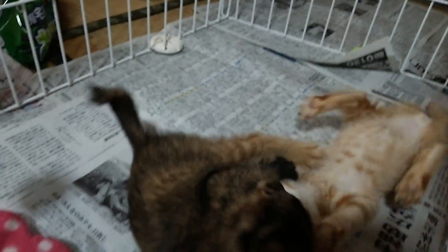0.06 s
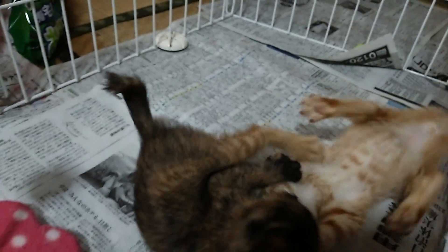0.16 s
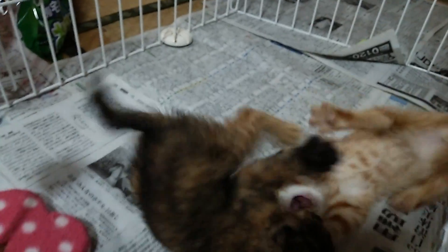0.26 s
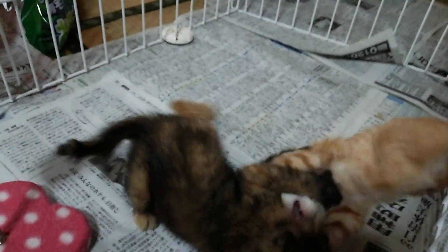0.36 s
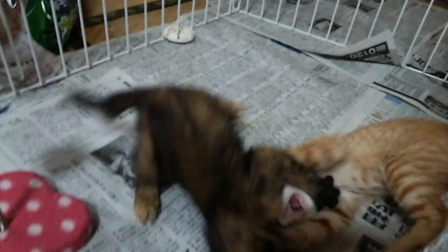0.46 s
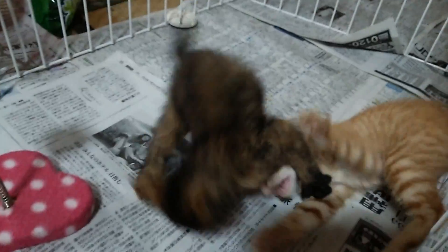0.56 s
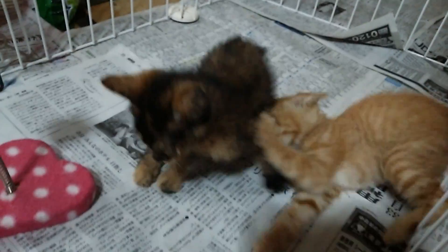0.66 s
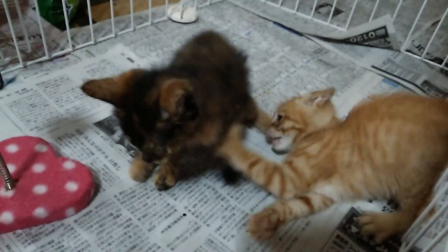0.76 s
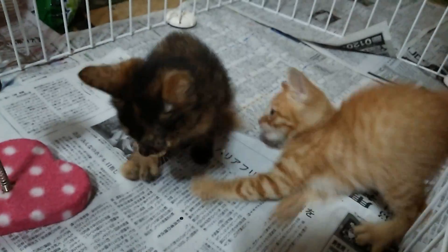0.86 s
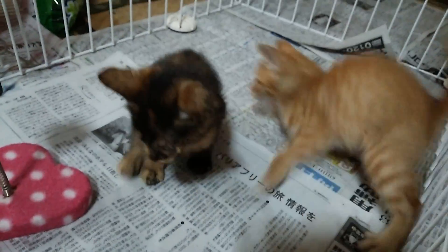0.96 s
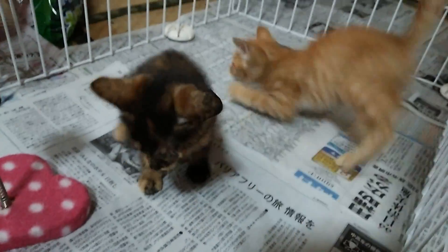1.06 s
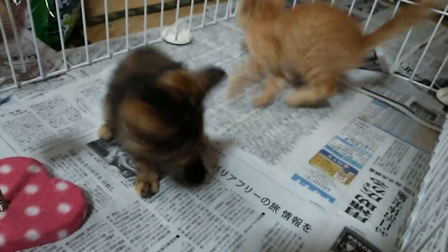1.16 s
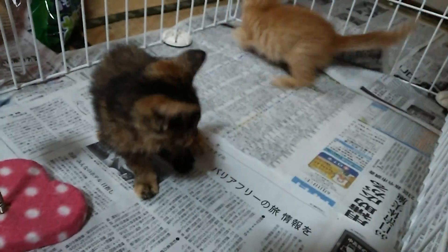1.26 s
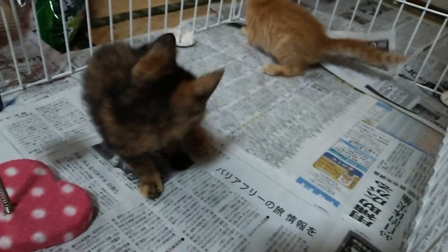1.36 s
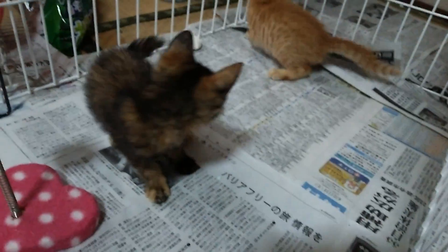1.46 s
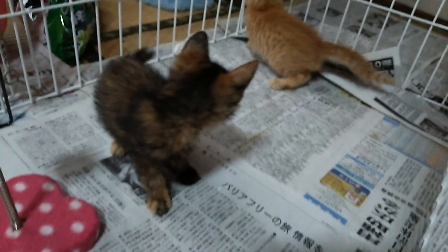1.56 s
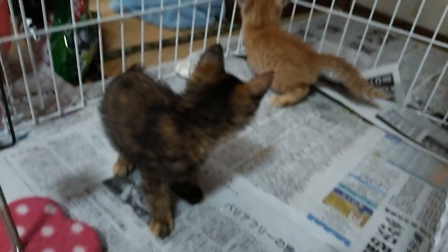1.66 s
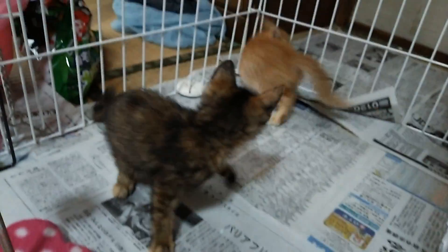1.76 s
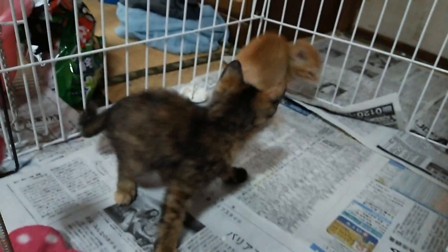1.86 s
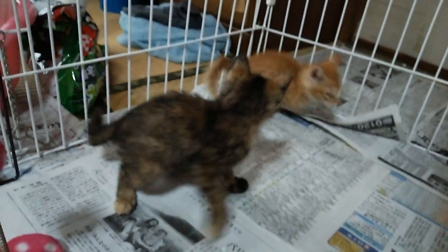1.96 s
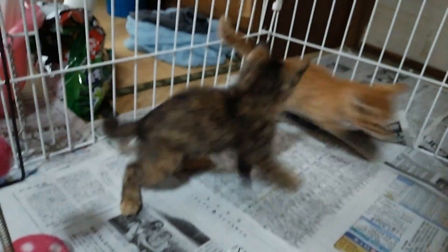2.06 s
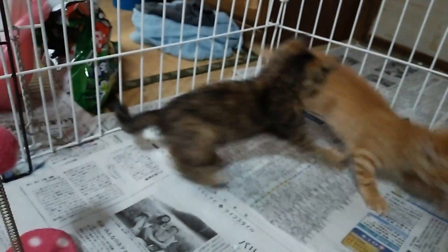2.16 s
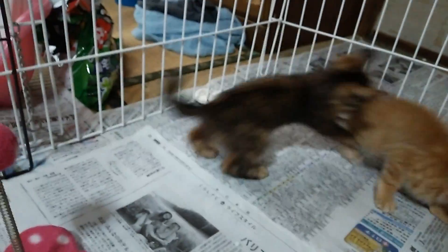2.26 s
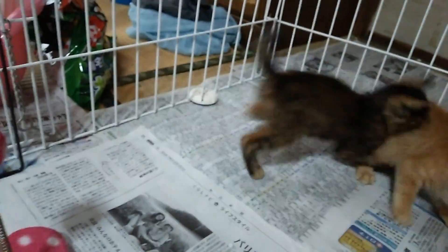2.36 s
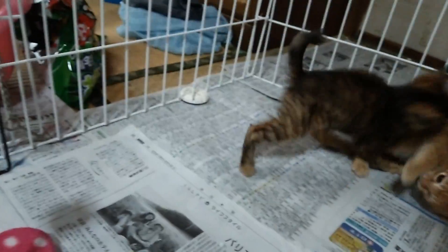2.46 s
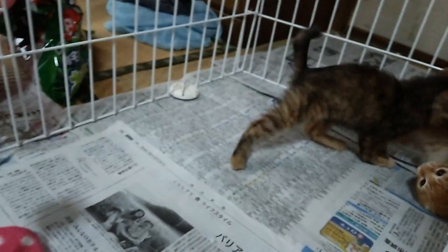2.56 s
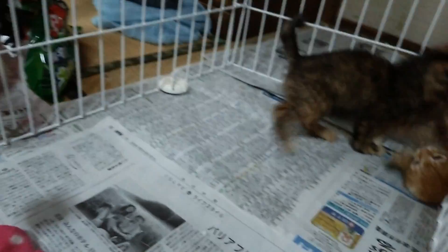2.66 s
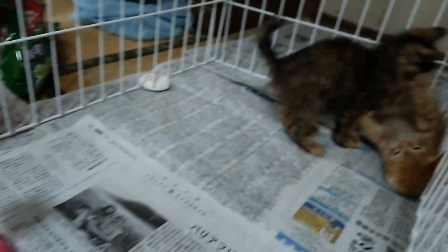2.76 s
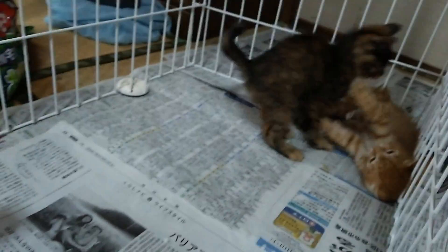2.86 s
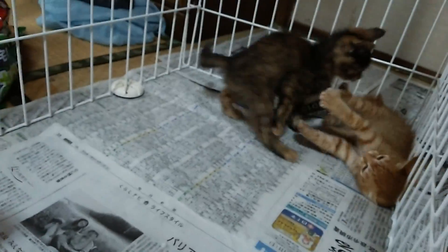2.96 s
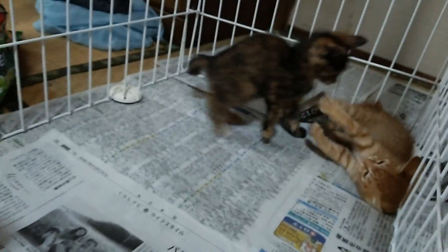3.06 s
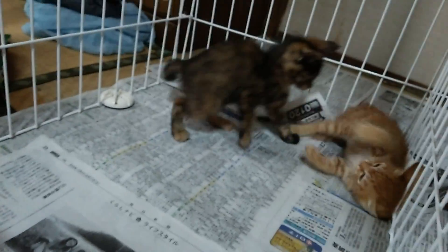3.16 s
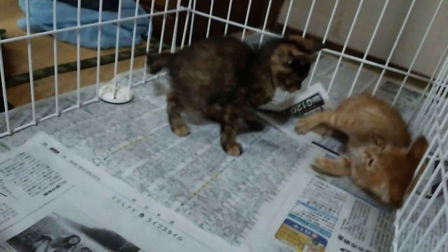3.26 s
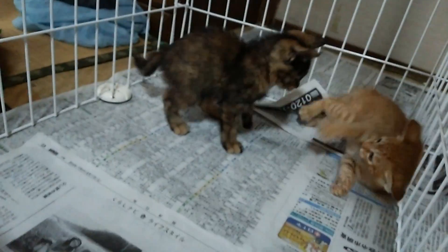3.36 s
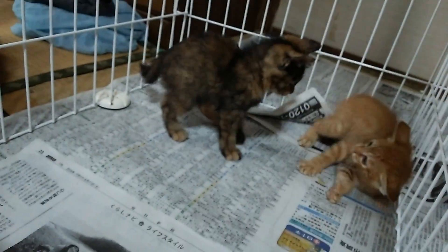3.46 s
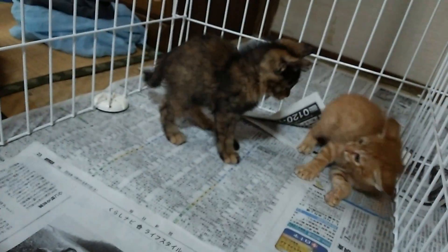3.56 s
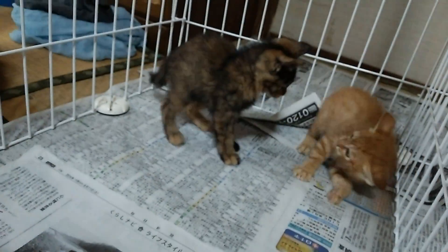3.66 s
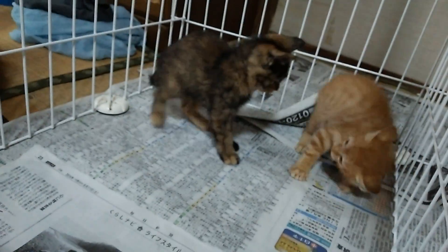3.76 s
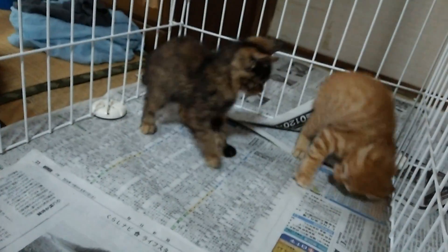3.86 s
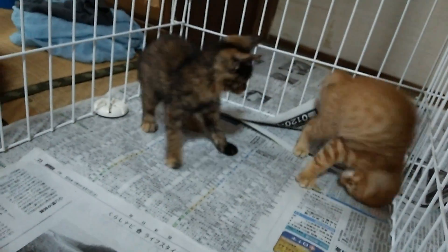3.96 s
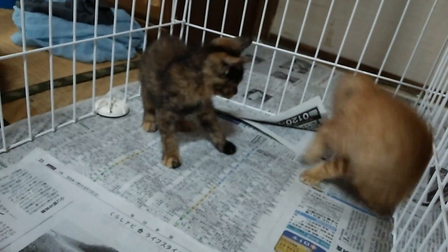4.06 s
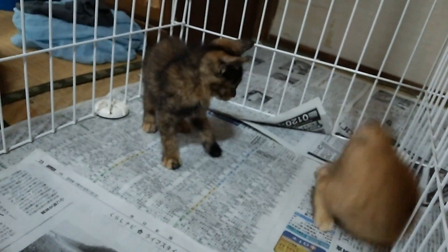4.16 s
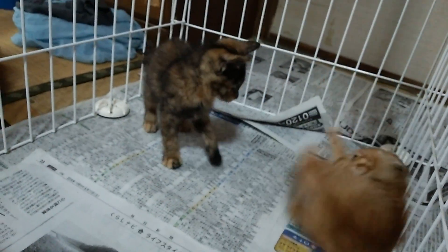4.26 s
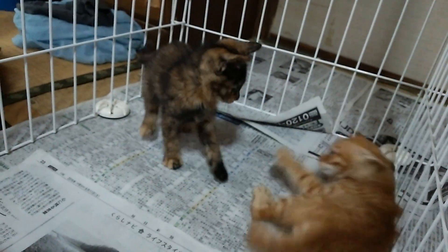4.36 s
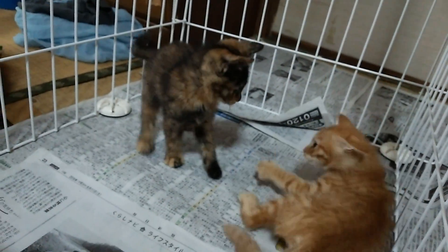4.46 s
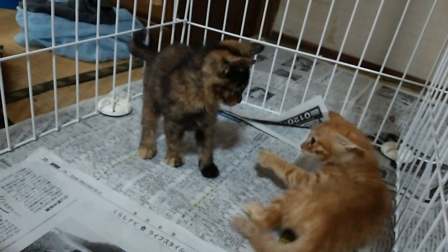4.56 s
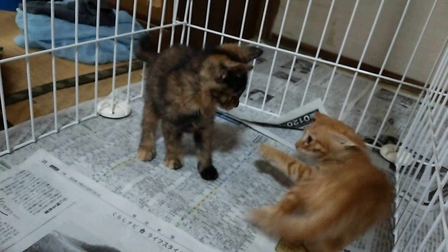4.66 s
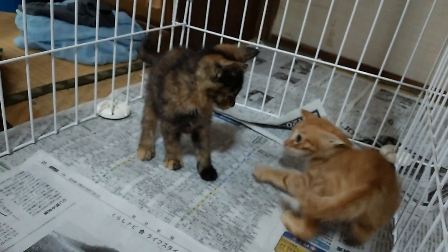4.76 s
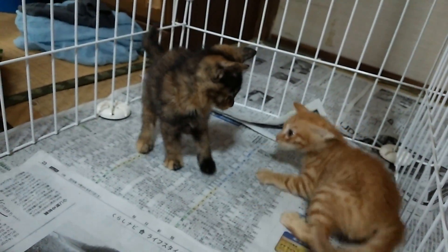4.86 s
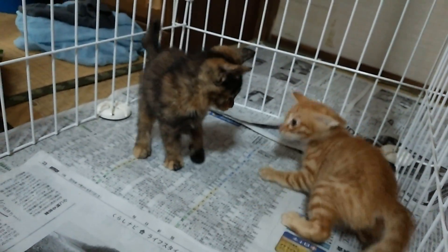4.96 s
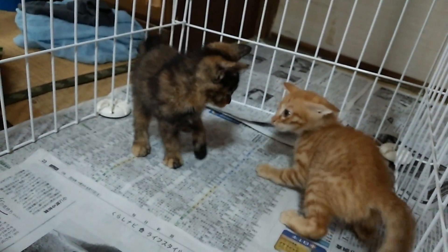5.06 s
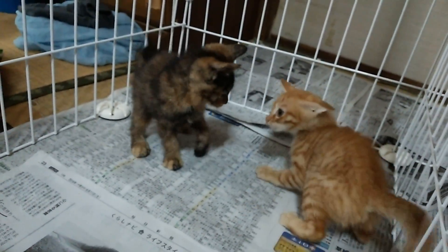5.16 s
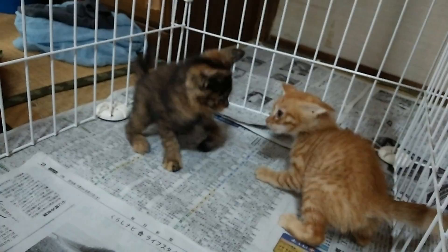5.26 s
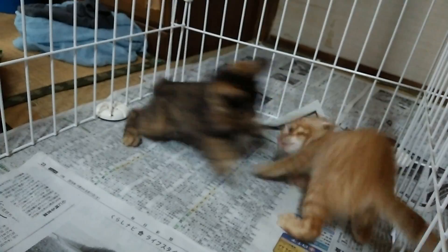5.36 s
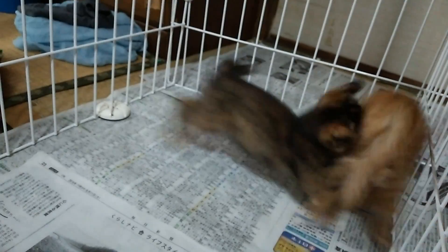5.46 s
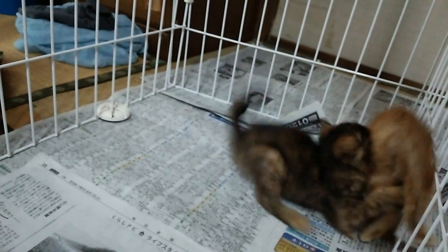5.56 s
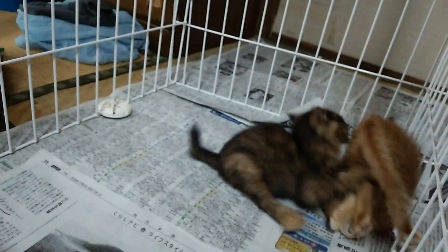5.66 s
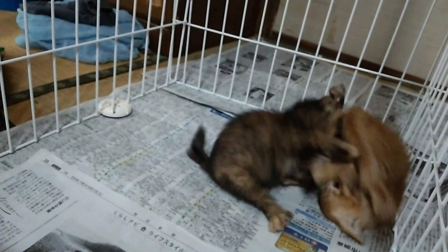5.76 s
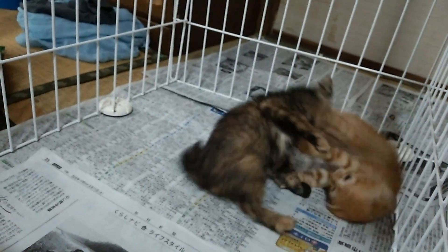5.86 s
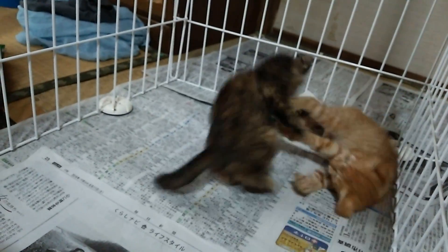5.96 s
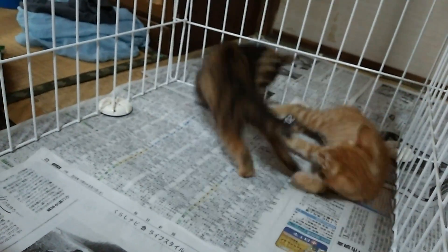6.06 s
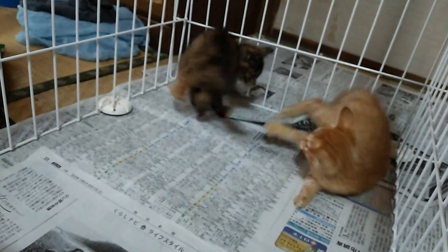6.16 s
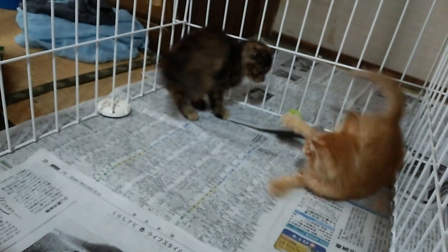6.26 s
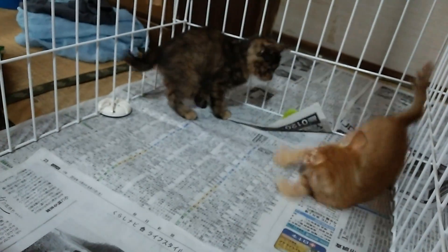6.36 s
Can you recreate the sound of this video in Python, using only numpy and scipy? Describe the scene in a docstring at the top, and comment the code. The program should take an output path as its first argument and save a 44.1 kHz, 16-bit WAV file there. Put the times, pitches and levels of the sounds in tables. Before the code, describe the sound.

Newspaper crinkles close to the microphone as two kittens wrestle on it indoors. Quick clusters of sharp paper cracks and rustles come with dull bumps on the floorboards and a few faint claw scrapes. Lighter, more separate crackles follow, then a short lull and a final pounce of crunching and thuds. The small room hums faintly underneath, along with a soft rumble from the hand holding the microphone.

```python
"""Two kittens wrestle on newspaper spread over the wooden floor of a wire pen, in a small quiet room.
Paws and claws snap the paper's creases, each a short crunch of tiny cracks. Bodies drag the paper and
thud on the boards, fur and claws scrape, and the room hums faintly. A hand-held camera listens with a
widened stereo pair: left and right swing opposite ways in the bass, and its treble peaks near 6 kHz."""
import sys
import numpy as np
from scipy import signal
from scipy.fft import rfft, irfft, next_fast_len
from scipy.io import wavfile
from scipy.ndimage import uniform_filter1d, map_coordinates

SR = 44100
rng = np.random.default_rng(int(sys.argv[2]) if len(sys.argv) > 2 else 0)


def output_pcm(signal):
    """Save a mono or channel-first signal as 16-bit PCM at the path in sys.argv[1].

    Samples are clipped to [-1, 1] before scaling.
    """
    pcm = np.clip(np.atleast_2d(signal).T, -1, 1) * 32767
    wavfile.write(sys.argv[1], SR, np.round(pcm).astype(np.int16))


N = 282240


def amp(db):
    """Turn decibels into a gain."""
    return 10 ** (np.asarray(db) / 20)


def unit(x):
    """Scale a sound to an average strength (rms) of 1."""
    return x / np.sqrt(np.mean(x ** 2) + 1e-20)


def along(points, hz):
    """Read a (pitch, value) table between its rows, on a scale of octaves."""
    pitches, values = np.transpose(points)
    return np.interp(np.log(hz + 1), np.log(pitches + 1), values)


def curves(rows):
    """Turn each column after the time into one value per sample."""
    times, *columns = np.transpose(rows)
    return [np.interp(np.arange(N) / SR, times, column) for column in columns]


def wobble(rate):
    """A smooth curve through `rate` random points a second."""
    return map_coordinates(rng.standard_normal(int(N * rate / SR) + 4), [np.arange(N) * rate / SR])


def noise(n=N):
    """Two separate white noises."""
    return rng.standard_normal((2, n))


def filtered(x, response):
    """Give each pitch in x the gain response(hz)."""
    n = x.shape[-1]
    size = next_fast_len(n + 4096)
    return irfft(rfft(x, size) * response(np.fft.rfftfreq(size, 1 / SR)), size)[..., :n]


def coloured(x, tone):
    """Shape x with a (pitch, level) table, at strength 1."""
    return unit(filtered(x, lambda hz: amp(along(tone, hz))))


def band(centre_hz, octaves):
    """A bell-shaped filter that lets a little of every other pitch through."""
    return lambda hz: np.exp(-(np.log2((hz + 1) / centre_hz) / octaves) ** 2 / 4) + amp(-23)


def crackle(n, spiky_db, size):
    """Two noises chopped into the same tiny cracks of uneven strength, `size` samples each."""
    strength = amp(spiky_db * rng.standard_normal(n // size + 1))
    return unit(np.repeat(strength, size)[:n] * noise(n))


def patchy(x, depth_db):
    """Random loud and soft patches in time and pitch: every fold of the sheet rings differently."""
    spectrum = signal.stft(x, nperseg=256)[2]
    patches = uniform_filter1d(rng.standard_normal(spectrum.shape[1:]), size=5, axis=0)
    patches = unit(uniform_filter1d(patches, size=8, axis=1))
    return unit(signal.istft(spectrum * amp(depth_db * patches), nperseg=256)[1][:, :N])


# how alike the two microphones sound: (pitch [Hz], likeness [0 to 1])
LIKENESS = [(60, .985), (250, .93), (700, .92), (1050, .8), (1400, .62), (2500, .5), (12000, .5)]
def widen(pair, lead_s=0):
    """The right side mixes its own sound with the left one, flipped over and lead_s early."""
    shared = filtered(pair[0], lambda hz: -along(LIKENESS, hz) * np.exp(2j * np.pi * hz * lead_s))
    own = filtered(pair[1], lambda hz: np.sqrt(1 - along(LIKENESS, hz) ** 2))
    return np.array([pair[0], shared + own])


# loudness of the low sounds: (time [s], rumble [dB], murmur [dB])
LOW_LEVELS = [(0, -55, -56), (.15, -67, -55.5), (.35, -60, -63), (.5, -48, -58.5), (.7, -61, -55),
              (1.0, -53, -59.5), (1.4, -63, -59), (1.6, -57.5, -62), (2.0, -58.5, -64), (2.5, -52, -57),
              (2.9, -56, -62.5), (3.5, -55.5, -57.5), (4.1, -56, -64), (4.33, -53, -58), (4.5, -60, -58.5),
              (4.8, -65, -69.5), (5.0, -59, -58.5), (5.2, -71.5, -73.5), (5.45, -57, -66.5),
              (5.75, -59, -56), (6.0, -48, -61), (6.4, -66, -59.5)]
# tone of the hand's rumble, the room's murmur and the microphone's hiss: (pitch [Hz], level [dB])
RUMBLE_TONE = [(25, -37.5), (36, -13), (47, -2), (60, -14.5), (80, -12.5), (130, -18.5), (200, -53.5)]
MURMUR_TONE = [(60, -34.5), (100, 2.5), (200, 4.5), (330, -3), (600, -4.5), (1000, -16), (1600, -31),
               (3000, -55)]
HISS_TONE = [(470, -20), (800, -2), (862, 15.5), (1420, -6), (1900, -11.5), (2870, -30), (4990, -5.5),
             (8990, -19.5), (16000, -34)]
def background():
    """The hand on the camera rumbles, the room hums and murmurs, and the microphone hisses."""
    t = np.arange(N) / SR
    rumble_db, murmur_db = curves(LOW_LEVELS)
    rumble = amp(rumble_db) * coloured(noise(), RUMBLE_TONE)
    hum_db = np.minimum(murmur_db - 1, -61.5)
    beating = np.cos(np.pi * (t - 3.5) / .37)  # two close hums swell together every 0.37 s
    hum = amp(hum_db) * beating * np.sqrt(2) * np.sin(2 * np.pi * 151 * t + 1.3 * wobble(10))
    murmur = amp(murmur_db + 1.5 * wobble(14)) * coloured(noise(), MURMUR_TONE)
    hiss = amp(-90.5) * coloured(noise(), HISS_TONE)
    return rumble + hum * [[1], [0]] + murmur + hiss


# how long the room rings: (pitch [Hz], time to fade by 60 dB [s])
ECHO_FADE = [(200, .3), (1000, 0.16), (4000, 0.26), (10000, 0.017)]
def room_echo(x):
    """The walls throw the sound back; each pitch dies away at its own speed."""
    hz, t, spectrum = signal.stft(noise(SR // 2), SR, nperseg=256)
    fade = amp(-60 * t / along(ECHO_FADE, hz)[:, None])
    tail = signal.istft(spectrum * fade, SR, nperseg=256)[1]
    delayed = np.pad(x, ((0, 0), (200, 0)))
    return signal.fftconvolve(delayed, tail / np.linalg.norm(tail[0]), axes=1)[:, :N]


# bodies landing: (time [s], level [dB], boom pitch [Hz], knock against boom [dB], time to fade 60 dB [s])
LANDINGS = [(0.455, -31.5, 68, -27, 0.23), (0.802, -39.5, 109, -7, 0.11), (0.969, -36, 61.7, -8.5, 0.21),
            (1.057, -47, 60.4, -16, 0.45), (1.134, -41, 67.5, -14, 0.22), (1.318, -31, 80, -22, 0.12),
            (1.379, -38.5, 81.5, -5, 0.22), (1.438, -43.5, 84.5, 3.5, 0.17), (2.04, -34.5, 94, -9, 0.063),
            (2.266, -46, 187, -9, 0.071), (2.356, -34.5, 73.6, -13, 0.27), (2.39, -44.5, 125, -9, 0.29),
            (2.427, -34.5, 98, -32, 0.099), (2.471, -45.5, 90, -4, 0.15), (2.84, -44.5, 49, -30, 0.11),
            (4.25, -37, 128, -11, 0.12), (4.321, -42, 96, -18, 0.25), (4.933, -38.5, 50.7, -10, 0.17),
            (4.963, -41.5, 91, -13, 0.18), (5.548, -43.5, 67, -19, 0.24), (5.612, -44.5, 79.6, -30, 0.29),
            (5.672, -32.5, 69.4, -6.5, 0.12), (5.736, -29, 71, -9, 0.22), (5.806, -40, 87.2, -12, 0.078),
            (5.963, -41, 82.4, -14, 0.45), (6.101, -45, 150, -0.5, 0.17), (6.197, -37.5, 97, -18, 0.19),
            (6.239, -43, 80.5, -1.5, 0.23)]
# tone of the shaking floor and of the knock: (pitch [Hz], level [dB])
SHAKE_TONE = [(30, -43.5), (55, -5.5), (100, 11.5), (180, 7.5), (300, -40.5)]
KNOCK_TONE = [(150, -46.5), (280, 21.5), (600, 15.5), (1200, -36)]
def floor_thuds():
    """A soft body sets a board booming at its own pitch; a harder landing adds a short knock."""
    out, t = np.zeros((2, N + SR)), np.arange(SR // 2) / SR
    for start, db, hz, knock_db, fade_s in LANDINGS:
        shape = (1 - np.exp(-t / .003)) * amp(-60 * t / fade_s)
        overtone = .26 * np.sin(2 * np.pi * 1.3 * hz * t) * amp(-60 * t / .16)
        boom = np.sin(2 * np.pi * hz * t) + overtone
        shake = .6 * coloured(noise(len(t)), SHAKE_TONE)
        knock = amp(knock_db - 60 * t / .097) * coloured(noise(len(t)), KNOCK_TONE)
        thud = shape * (boom * [[1], [0]] + shake) + knock
        out[:, round(start * SR):][:, :len(t)] += amp(db) * thud
    return out[:, :N]


# strokes of fur and claws: (start [s], end [s], pitch [Hz], width [octaves], level [dB])
STROKES = [(0.07, 0.193, 684, 0.36, -59), (1.16, 1.313, 1750, 0.19, -60), (1.429, 1.58, 2240, 0.24, -74),
           (2.688, 2.756, 5400, 0.096, -56.5), (3.94, 4.164, 5340, 0.098, -61.5),
           (3.967, 4.1, 3150, 0.054, -73), (4.845, 4.905, 5570, 0.38, -65),
           (5.362, 5.458, 6240, 0.3, -58.5), (6.292, 6.313, 745, 0.32, -61)]
def scrapes():
    """Sliding fur and claws make grainy noise in one narrow band that swells and fades."""
    out, t = np.zeros((2, N)), np.arange(N) / SR
    for start, end, hz, octaves, db in STROKES:
        swell = np.clip(np.minimum(t - start, end - t) / .03, 0, 1)
        out += amp(db + .9 * wobble(50)) * swell * unit(filtered(noise(), band(hz, octaves)))
    return out


# loudness of the sliding paper: (time [s], level [dB], dull flap against fizz [dB])
DRAG_LEVELS = [(0, -64.5, 1), (.14, -67.5, -4), (.29, -78.5, 0), (.45, -50, -7.5), (.7, -59.5, -5),
               (.9, -56.5, -1), (1.1, -50, -1.5), (1.27, -72, 5), (1.33, -46.5, -2.5), (1.4, -48.5, -2),
               (1.57, -73, 3), (1.79, -77, -1), (1.86, -67, 0.5), (1.95, -68.5, 1), (2.07, -52.5, -2),
               (2.25, -78, -1), (2.45, -48.5, -1.5), (2.62, -65, 0.5), (2.75, -62, -7), (2.95, -79.5, -1.5),
               (3.05, -63, -2), (3.4, -65, -0.5), (3.55, -68.5, -2), (3.68, -59.5, -1), (3.85, -76.5, -5),
               (4.0, -65.5, -15), (4.3, -65, -2.5), (4.68, -67.5, -4.5), (4.72, -81.5, -3.5),
               (4.8, -88.5, -4), (4.95, -63, -2.5), (5.1, -91, -3), (5.33, -90, 2), (5.45, -57.5, -2),
               (5.78, -59, -1.5), (5.88, -63.5, -7), (6.0, -59.5, -4), (6.2, -61, 4), (6.3, -69, 3.5),
               (6.4, -55, -3)]
# tone of the paper's fizz and of a slack sheet flapping: (pitch [Hz], level [dB])
FIZZ_TONE = [(880, -41.5), (1500, -32), (1760, -19), (2490, 1), (3060, -4), (3310, 1), (3690, -4.5),
             (6000, 2.5), (8000, 1), (9370, -7), (10000, -10.5), (12000, -20.5), (14600, -63.5),
             (16000, -58.5)]
FLAP_TONE = [(250, -3), (500, -0.5), (800, 0), (1200, -1.5), (2000, -2), (3000, -5), (5000, -39.5)]
def paper_drag():
    """Dragged or settling paper fizzes with clumps of cracks; low, middle and top swell separately."""
    db, flap_db = curves(DRAG_LEVELS)
    fizz = patchy(coloured(crackle(N, spiky_db=4.2, size=24), FIZZ_TONE), depth_db=3)
    top = filtered(fizz, lambda hz: 1 / (1 + (7000 / (hz + 1)) ** 12))
    flap = patchy(coloured(crackle(N, spiky_db=1.5, size=96), FLAP_TONE), depth_db=-1.5)
    clumps = amp(2 * wobble(45) + 2 * wobble(140))
    rustle = unit(fizz - top) + amp(-4 + .72 * wobble(45)) * unit(top)
    rustle += amp(flap_db + wobble(41)) * flap
    level = np.sqrt(amp(2 * db) + settling_power())
    return level * clumps * sides(-1.5 + 3 * wobble(10)) * widen(rustle, lead_s=8e-5)


def sides(pan_db):
    """Left and right gains, with the left pan_db louder."""
    return amp(np.array([pan_db / 2, -pan_db / 2]))


def settling_power(under_db=-17, fade_s=.24):
    """The sheet rustles on after each crease, more after a loud or long one."""
    start, db, *_, length = np.transpose(CREASES)
    times = np.arange(0, N / SR, .002)
    age = times[:, None] - start
    power = amp(2 * (db + under_db - 60 * np.maximum(age, 0) / fade_s)) * length / .005 * (age > 0)
    return np.interp(np.arange(N) / SR, times, power.sum(axis=1))


def faint_creases(count=45):
    """Small creases at random moments, about as loud as the sliding paper; rows like CREASES."""
    when, length = rng.random((count, 2)).T
    level, pitch, flap, pan = rng.standard_normal((count, 4)).T
    start = .01 + when * (N / SR - .02)
    db = np.interp(start, *np.transpose(DRAG_LEVELS)[:2]) + 1 + 3 * level
    return list(zip(start, db, 4500 * 1.25 ** pitch, -9 + 7 * flap, 4 * pan, .012 * length))


# the microphone's main range, and the sizzle on top of a crack: (pitch [Hz], level [dB])
MIC_RANGE = [(600, -36), (1500, 0.5), (8000, 1.5), (9400, -8), (11000, -21), (13000, -52.5)]
SIZZLE_TONE = [(7000, -40), (9500, -8.5), (12000, -3), (14800, -17), (16200, -22)]
# creases giving way under paws:
# (time [s], level [dB], pitch [Hz], flap against crunch [dB], left over right [dB], length [s])
CREASES = [(0.025, -66, 5400, -4, -22, 0.018), (0.085, -63, 3530, 2, -8, 0.0059),
           (.316, -54.5, 5090, -8, -2, 0.0025), (0.3266, -40, 6650, -33, -0.5, 0.0025),
           (0.34, -47.5, 6500, -19, -8, 0.0073), (0.426, -46, 5070, -15, 1, 0.013),
           (0.4462, -31.5, 4800, -4, -1, 0.011), (0.518, -29.5, 4630, -19.5, 8, 0.0017),
           (0.5417, -36.5, 4370, -13.5, 2.5, 0.0041), (.574, -48, 5120, -10, 2, 0.013),
           (0.5927, -39, 4100, -13, 3.5, 0.0027), (0.605, -41, 4300, -8.5, 5.5, 0.0044),
           (0.6783, -50, 4200, 0, 4, 0.0038), (0.753, -50.5, 4840, -8, 1, 0.013),
           (0.796, -42.5, 5030, -11.5, 6.5, 0.015), (0.859, -42, 5030, -14, 2, 0.01),
           (0.8737, -39, 5060, -17, 7, 0.0013), (0.884, -34, 4880, -15, 1.5, 0.0013),
           (0.891, -44, 4160, -1, -3, 0.0053), (0.924, -42.5, 5400, -5.5, 2, 0.001),
           (0.962, -45.5, 5000, -13, 2, 0.0079), (0.969, -31, 4900, -5.5, 3.5, 0.002),
           (0.997, -36.5, 5100, -6.5, -0.5, 0.01), (1.042, -38.5, 5040, -14, 1, 0.014),
           (1.059, -24, 5700, -19, 8, 0.0013), (1.069, -23.5, 7000, -26, 5, 0.0026),
           (1.11, -36, 5630, -17, 0, 0.019), (1.128, -34.5, 4800, -11, -0.5, 0.0098),
           (1.1985, -45, 3940, -18, -2, 0.011), (1.213, -55, 4360, -13, -16, .006),
           (1.265, -52, 3160, -1, -9, .0027), (1.301, -29, 5830, -18, 0.5, 0.011),
           (1.354, -33, 4330, -11.5, -3, 0.018), (1.3788, -26, 4800, -27, -3.5, 0.013),
           (1.433, -45, 5210, 5, -2, 0.0031), (1.483, -40, 2350, -11, 1.5, 0.0032),
           (1.5088, -33, 2250, -10, 0.5, 0.0003), (1.521, -41, 4630, -16, -5, 0.00098),
           (1.63, -54, 2600, -44, -2, .0033), (1.667, -61, 3060, -2, -1.5, 0.036),
           (1.82, -62.5, 2480, -15, 2, .0042), (1.832, -49.5, 3160, -13, -0.5, 0.0058),
           (1.908, -56.5, 2100, -10, 6, .0023), (1.9864, -32.5, 4700, -34, -2, 0.013),
           (2.029, -33, 4500, -12.5, -0.5, 0.011), (2.119, -37.5, 4550, -17, -2, 0.0045),
           (2.133, -40.5, 5200, -1.5, -1, 0.0031), (2.144, -41.5, 6360, -32, -2, 0.0076),
           (2.268, -38.5, 5800, -17.5, 0.5, 0.013), (2.309, -40.5, 5000, -10, -2.5, 0.016),
           (2.3535, -26.5, 6050, -29, 2.5, .011), (2.391, -39, 5130, -11, -8, 0.011),
           (2.428, -39, 3570, -13, -2, 0.0078), (2.471, -31, 3330, -6.5, -3.5, 0.0058),
           (2.535, -56, 4600, -10, -20, 0.005), (2.589, -56.5, 4060, -17, -2, 0.02),
           (2.6324, -61.5, 2380, 13.5, 0, 0.013), (2.728, -48, 5950, -21, -2, .0027),
           (2.825, -62, 6650, -15, -7, 0.024), (2.85, -68, 6000, -10, 2.5, 0.0046),
           (2.985, -54, 4500, -6, -4.5, .008), (2.995, -41, 3640, -9.5, -1, 0.014),
           (3.0856, -32, 5130, -30, 0.5, 0.0019), (3.0964, -43, 5270, -14, 7, 0.0012),
           (3.165, -56, 5270, -23, -2, 0.029), (3.2468, -37, 4660, -6.5, 2.5, 0.0014),
           (3.259, -43, 4570, -8.5, 3, 0.0079), (3.283, -47.5, 2840, -1.5, .5, 0.0085),
           (3.3444, -36.5, 5900, -14, 5, 0.0019), (3.357, -46, 5140, -17, -6, 0.0098),
           (3.564, -51.5, 4760, -4.5, 1, 0.0067), (3.63, -41.5, 5500, -28, 1, 0.0026),
           (3.641, -43.5, 3200, -4.5, 0, 0.0044), (3.68, -41, 6100, -13.5, 5, 0.0011),
           (3.798, -53, 5200, -24, 0, .0025), (3.903, -62.5, 4530, -3.5, 2, .0097),
           (4.166, -44.5, 4860, -10, 7, 0.0034), (4.1748, -32.5, 6460, -11, -1.5, 0.0019),
           (4.252, -50.5, 4720, -15, -3, 0.0085), (4.2992, -35.5, 5750, -14, 0, 0.0078),
           (4.331, -44, 5810, -24, -3, .005), (4.35, -46.5, 5540, -20, -4, .0056),
           (4.464, -50, 5250, -1, 5, 0.0077), (4.5268, -39, 5700, -9, -6.5, .0015),
           (4.58, -66, 5050, -14, 0, 0.0023), (4.645, -53, 4840, -9, 8, 0.0014),
           (4.903, -70, 2200, -11, -1, 0.012), (4.762, -67.5, 4500, -11, 0, .003),
           (4.9312, -31.5, 7100, -10, -3, 0.0029), (4.952, -51, 5200, -7, -8, 0.0013),
           (5.0583, -61, 4100, -3, -5, 0.0085), (5.0802, -62, 5000, -9.5, -2.5, .0029),
           (5.128, -67.5, 4000, -4, 2, .003), (5.418, -49, 4530, -10, -1, 0.0079),
           (5.429, -39.5, 3900, -0.5, -2.5, 0.011), (5.4785, -41, 4930, -2.5, 0, 0.0028),
           (5.4857, -34, 3900, -1, 0, 0.00088), (5.503, -52, 3540, 0, -13, .0022),
           (5.554, -49, 4350, -5.5, 5, 0.0049), (5.574, -49, 5370, -29, 4, .0122),
           (5.594, -46, 6500, -31, -3, 0.019), (5.6454, -32, 4300, -35, -6, .0022),
           (5.6726, -34.5, 4700, -2, 0, 0.0068), (5.7, -48, 2430, 8.5, 3.5, 0.0022),
           (5.7356, -38.5, 5160, -3, 2, 0.0044), (5.753, -33.5, 4550, -6.5, 3.5, 0.0067),
           (5.995, -61, 3650, 3.5, 4.5, 0.021), (6.063, -61.5, 4100, 7, 7.5, 0.0078),
           (6.088, -57.5, 5250, 2, 10, 0.0085), (6.137, -51.5, 5410, -9, 8, 0.0048),
           (6.148, -48, 4460, -0.5, 2, 0.0024), (6.171, -46.5, 2510, -10, -0.5, 0.01),
           (6.18, -43.5, 5000, -15, 8, .006), (6.1868, -37, 4300, -20, 1.5, 0.015),
           (6.2254, -32, 3970, -9, -1, 0.00085), (6.286, -49, 4830, -15, -7, 0.0025),
           (6.2947, -52, 3230, 4, -4, 0.024), (6.3495, -49, 4720, -15, 7, .0026),
           (6.3686, -45.5, 3900, -37, 7, 0.0055)]
def crease_snaps(fade_s=.018):
    """A crease snaps with a short crunch of cracks, a sizzle on top and a duller flap of the sheet."""
    out, t = np.zeros((2, N + SR)), np.arange(SR // 8) / SR - .004
    for start, db, centre_hz, flap_db, pan_db, length in CREASES + faint_creases():
        rise = np.exp(np.minimum(t - .33 * length, 0) / (.0003 + .17 * length))  # creaks before it gives
        shape = rise * amp(-60 * np.clip(t - length, 0, 1) / fade_s)
        octaves = .37 if centre_hz > 2770 else .22  # low creases ring in a narrower band
        cracks = crackle(len(t), spiky_db=4, size=20)
        crunch = filtered(cracks, lambda hz: band(centre_hz, octaves)(hz) * amp(along(MIC_RANGE, hz)))
        sizzle = coloured(cracks, SIZZLE_TONE)
        flap = coloured(noise(len(t)), FLAP_TONE)
        lead_s = rng.uniform(-.0001, .000339)  # each crease lies at its own angle to the microphones
        parts = np.array([widen(shape * part, lead_s) for part in (crunch, sizzle, flap)])
        # a blow spends a set energy, however its cracks fall
        crunch, sizzle, flap = parts * np.linalg.norm(shape) / np.linalg.norm(parts, axis=-1)[..., None]
        sizzle_db = -34.5 + 14 * np.log2(centre_hz / 4500)  # higher creases sizzle more
        snap = crunch + amp(sizzle_db) * sizzle + amp(flap_db) * flap
        out[:, round((start + t[0]) * SR):][:, :len(t)] += amp(db) * sides(pan_db)[:, None] * snap
    return out[:, :N]


def scene():
    """The paper close by and its echo, over the thuds and the background."""
    paper = crease_snaps() + paper_drag() + widen(scrapes())
    echo = amp(-12) * room_echo(paper)
    return paper + widen(echo + floor_thuds() + background())


# how the two microphones differ in tone: (pitch [Hz], left over right [dB])
MIC_BALANCE = [(60, 4.3), (250, 3), (500, 3.2), (1000, 6), (2400, 8.5), (5900, 9.5), (6900, 2.5),
               (7700, -6.5), (8700, -2.5), (10000, 1), (15000, 2)]
def record(dry):
    """Each microphone has its own tone; bass under 36 Hz fades and nothing over 16.2 kHz passes."""
    passed = lambda hz: (hz < 16200) / (1 + (36 / (hz + 1)) ** 6)
    return filtered(dry, lambda hz: sides(along(MIC_BALANCE, hz)) * passed(hz))


dry = scene()
out = record(dry)
output_pcm(out)
```